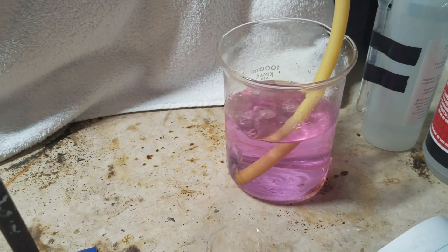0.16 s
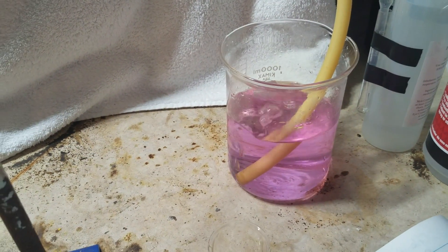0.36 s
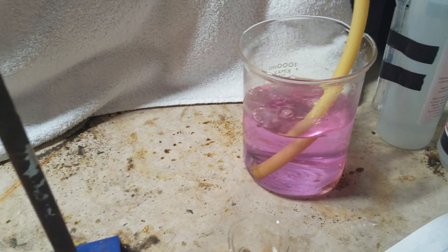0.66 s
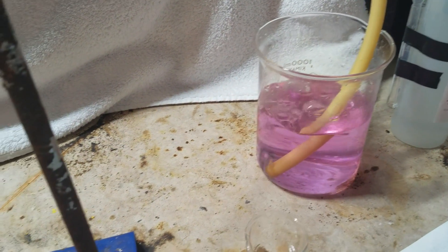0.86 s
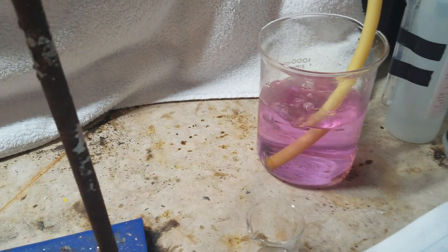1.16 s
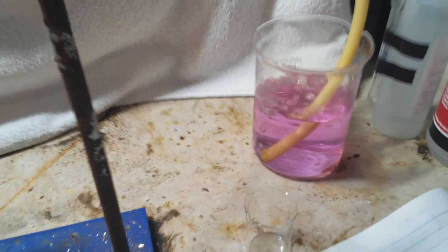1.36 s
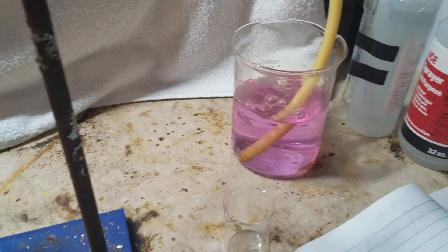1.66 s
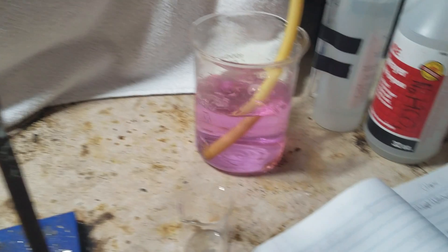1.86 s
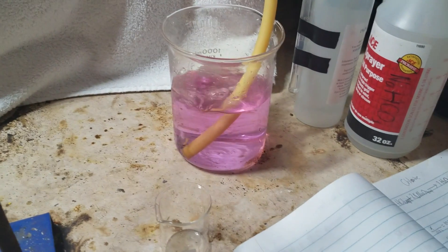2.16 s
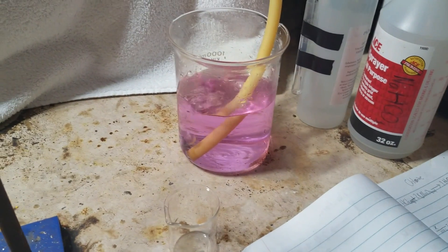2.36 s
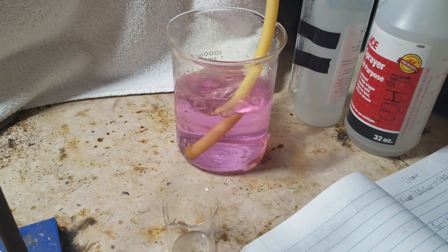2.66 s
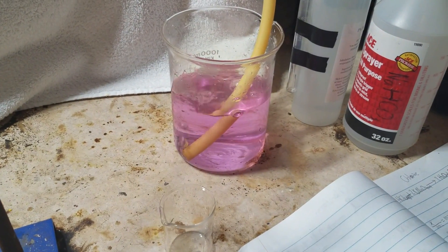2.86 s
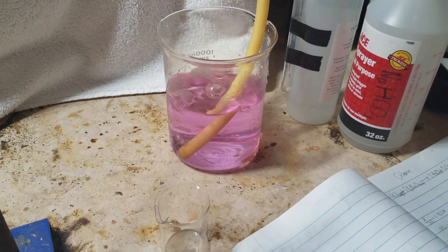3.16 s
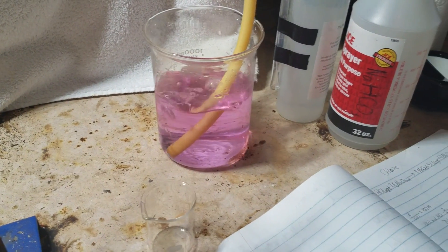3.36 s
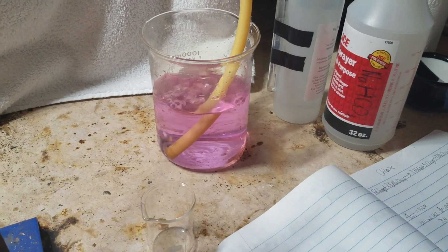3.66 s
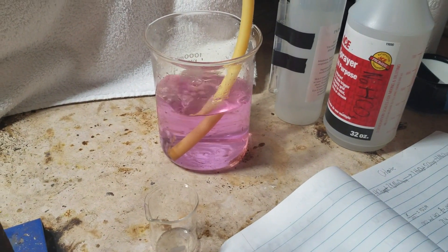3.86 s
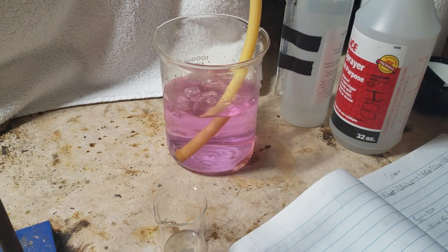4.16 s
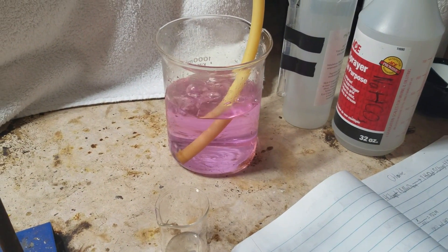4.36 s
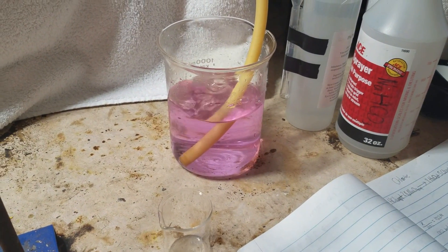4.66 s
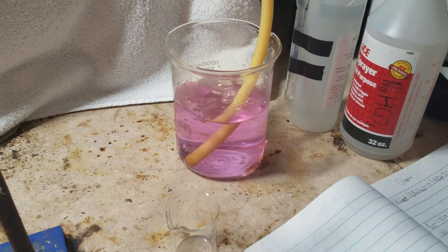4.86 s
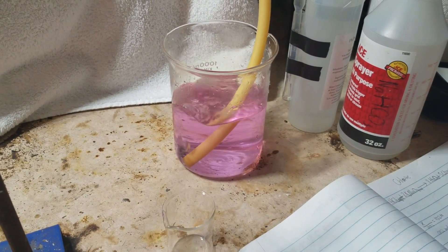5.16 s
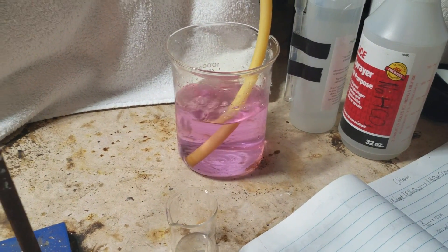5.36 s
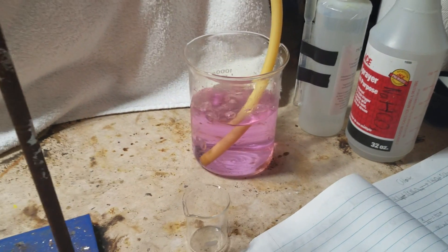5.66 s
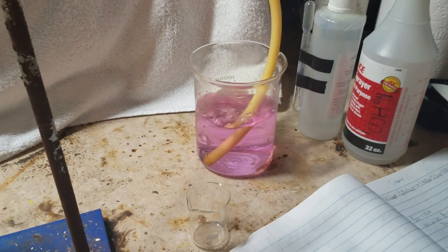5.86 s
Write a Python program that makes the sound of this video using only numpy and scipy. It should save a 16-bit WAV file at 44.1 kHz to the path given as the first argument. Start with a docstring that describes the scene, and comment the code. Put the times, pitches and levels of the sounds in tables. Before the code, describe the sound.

Wet, round glugs keep coming unevenly in a beaker on a lab bench, often in pairs, with tiny bubbles chirping and snapping at the surface. Handling of the camera adds fabric rustle, then a longer hissing slide, one sharp knock and clatter before the middle, and scattered crackly brushes towards the end. The microphone is very close, the room dry, with soft tone underneath.

```python
"""Gas from a rubber hose bubbles through liquid in a glass beaker on a lab bench, close to the microphones.
Each bubble is a damped, unsteady tone that gulps; some chirp upward in gliding tones as they open at
the surface, and tiny ones tick in narrow bursts of noise. Shaped noise brushes and slides like cloth by
the hand-held camera, and a set of bench resonances gives one knock with its rattle. Room tone, a faint
hum and a thin hiss lie underneath."""
import sys
import numpy as np
from scipy import signal
from scipy.fft import rfft, irfft, next_fast_len
from scipy.io import wavfile
from scipy.ndimage import map_coordinates

SR = 44100
rng = np.random.default_rng(int(sys.argv[2]) if len(sys.argv) > 2 else 0)


def generate_wav(sig):
    """Save sig (samples, or channels by samples) to the path in sys.argv[1] as 16-bit PCM at SR."""
    pcm = np.round(np.clip(np.atleast_2d(sig).T, -1, 1) * 32767).astype(np.int16)
    wavfile.write(sys.argv[1], SR, pcm)


N = 265482
AGE = np.arange(SR // 3) / SR  # time since an event began, s

# glugs from the hose; in many, deeper bubbles follow the first:
# start_s, level_db, pitch_hz, then for each follower: wait_s, level_db
GLUGS = [(.002, -50, 400, .024, -41.5), (.153, -44, 430, .041, -41, .078, -45.5), (.166, -43, 420),
         (.339, -48, 470, .036, -45, .078, -43.5), (.352, -46, 415), (.525, -49, 436, .058, -43),
         (.655, -52, 543), (.737, -38, 450), (.811, -42, 500), (.826, -45, 430),
         (.918, -49, 440, .055, -41), (1.074, -44, 440, .055, -37.5),
         (1.257, -45, 417, .035, -43, .087, -47), (1.431, -46, 522, .06, -42), (1.466, -47, 415),
         (1.588, -48, 429, .052, -37.5), (1.765, -44, 450, .041, -41), (1.949, -45, 535, .044, -41),
         (2.069, -38, 552), (2.121, -33, 413, .022, -39), (2.268, -38.5, 480), (2.677, -39, 500, .012, -41),
         (2.758, -42.5, 412, .046, -43), (2.86, -36.5, 525), (2.949, -42, 561, .045, -46),
         (3.049, -38, 499), (3.139, -40, 440, .037, -50), (3.23, -42, 485), (3.268, -47, 509),
         (3.334, -48, 455, .036, -45), (3.419, -42, 544), (3.536, -45, 422, .062, -45),
         (3.727, -44, 448, .063, -45), (3.907, -49, 430, .026, -43, .074, -46),
         (4.091, -47, 448, .021, -45, .068, -42), (4.281, -46, 447, .019, -43.5), (4.354, -39.5, 460),
         (4.376, -46, 377), (4.477, -45, 355, .059, -41.5), (4.671, -45.5, 400, .045, -43),
         (4.84, -49, 451, .04, -41.5), (4.926, -46, 630), (5.028, -45, 449, .034, -48), (5.115, -45, 530),
         (5.209, -45.5, 430, .043, -43), (5.326, -43.5, 529), (5.36, -47, 458), (5.4, -39.5, 424),
         (5.427, -47.5, 441), (5.514, -49, 482, .041, -40, .084, -47), (5.7, -50, 428, .049, -40.5),
         (5.908, -44, 363)]
# colour of the hiss of cloth, also used for the thin background hiss: frequency_hz, level_db (per Hz)
HISS_COLOUR = [(1760, -16), (3000, -7), (3940, -7.5), (7200, -13.5), (8580, -8), (9730, -12), (14700, -7),
               (16000, -10)]


def amp(db):
    """Decibels to gain."""
    return np.exp(np.asarray(db) * (np.log(10) / 20))


def unit(x):
    """x at rms 1."""
    return x / np.sqrt(np.mean(x ** 2) + 1e-20)


def along(points, hz):
    """(Hz, value) points read on a log frequency axis."""
    f, v = np.transpose(points)
    return np.interp(np.log(hz + 1), np.log(f + 1), v)


def gain_curve(points):
    """One gain per sample from (s, dB) points, at -120 dB outside them."""
    s, db = np.transpose(points)
    return amp(np.interp(np.arange(N) / SR, s, db, left=-120, right=-120))


def wobble(rate):
    """A smooth random curve, rate knots a second."""
    knots = rng.standard_normal(int(N * rate / SR) + 4)
    return map_coordinates(knots, [np.arange(N) * rate / SR])


def filtered(x, response):
    """x times a response of frequency."""
    size = x.shape[-1]
    m = next_fast_len(size + SR // 4)
    return irfft(rfft(x, m) * response(np.fft.rfftfreq(m, 1 / SR)), m)[..., :size]


def add(track, s, sound):
    """Mix a sound into a track at time s."""
    size = track.shape[-1]
    start = int(np.clip(round(s * SR), 0, size - 1))
    track[..., start:start + sound.shape[-1]] += sound[..., :size - start]


def noise(spectrum, alike=None):
    """Stereo noise of rms 1; mid and side are balanced to set the likeness of left and right."""
    # usual likeness of the two channels: frequency_hz, correlation (-1 to 1)
    usual_alike = [(60, 0.13), (200, 0.67), (600, 0.83), (1400, -0.16), (2600, -0.19), (6000, 0.058),
                   (15000, -0.058)]
    likeness = usual_alike if alike is None else alike

    def mid_and_side(hz):
        turn = np.arccos(np.clip(along(likeness, hz), -1, 1)) / 2
        return amp(along(spectrum, hz)) * [np.cos(turn), np.sin(turn)]

    mid, side = filtered(rng.standard_normal((2, N)), mid_and_side)
    return unit(np.array([mid + side, mid - side]))


def fade(t60, attack):
    """A quick rise and an exponential decay."""
    return amp(-60 * AGE / max(t60, 1e-3)) * (1 - np.exp(-AGE / attack))


def ring(hz, t60, attack):
    """One damped vibration."""
    return np.sin(2 * np.pi * hz * AGE) * fade(t60, attack)


def struck(modes, attack):
    """All modes of a body, at slightly new strengths and random polarity for each blow."""
    strength = amp(2 * rng.standard_normal(len(modes))) * rng.choice([-1, 1], len(modes))
    return sum(g * amp(db) * ring(hz, t60, attack) for g, (hz, db, t60) in zip(strength, modes))


def snap(hz, t60, octaves):
    """A burst of noise of peak 1 around one frequency."""
    distance = np.square(np.log2((np.fft.rfftfreq(len(AGE), 1 / SR) + 1) / hz) / octaves)
    coloured = irfft(rfft(rng.standard_normal(len(AGE))) / (1 + distance * distance), len(AGE))
    burst = coloured * fade(t60, attack=0.000067)
    return burst / np.abs(burst).max()


def from_left(x, lag_s):
    """x reaching the left microphone lag_s before the right, by opposite phase slopes."""
    return filtered(x, lambda hz: np.exp(1j * np.pi * hz * lag_s * np.array([[1], [-1]])))


def background():
    """Room tone as shaped noise, a faint hum of unsteady sines and a thin flickering hiss."""
    # colour of the room tone: frequency_hz, level_db (per Hz)
    air_colour = [(20, -30), (35, -24), (55, -13), (100, -8), (155, -24), (250, -9.5), (380, -10.5),
                  (700, -16.5), (1300, -21), (2300, -23.5), (5500, -36), (16000, -38)]
    # hum before its level wanders: frequency_hz, level_db
    hum_tones = [(120, -78), (366, -71)]
    # relative level of the thin hiss: time_s, level_db
    fizz_level = [(0.0, -74), (0.84, -77), (1.24, -74), (1.42, -67), (2.21, -61), (3.0, -72), (4.79, -72),
                  (4.95, -76), (5.9, -72), (6.02, -67)]
    t = np.arange(N) / SR
    hum = sum(amp(db + 2.8 * wobble(2.86)) * np.sin(2 * np.pi * hz * t) for hz, db in hum_tones)
    fizz = amp(3.8 + 2.2 * wobble(90)) * gain_curve(fizz_level) * noise(HISS_COLOUR)
    return amp(-62.6) * noise(air_colour) + hum + fizz


def fibres(spectrum):
    """Unevenly catching cloth: noise with sparse clicks in it."""
    crackle_db, crackles_per_s = -5, 260  # single fibres catching, relative to the noise
    clicks = (rng.random(N) < crackles_per_s / SR) * rng.standard_normal((2, N))
    crackle = unit(filtered(clicks, lambda hz: amp(along(spectrum, hz))))
    unevenness_db = 1.1 * wobble(45) + 1.6 * wobble(160) + 1.9 * wobble(900)
    return (noise(spectrum) + amp(crackle_db) * crackle) * amp(unevenness_db)


def cloth():
    """Friction as shaped noise: a faint rustle, short brushes with snags, and one long hissing slide."""
    # faint rustle that never quite rests: time_s, level_db
    rustle_level = [(0, -73), (.4, -70), (.65, -80), (1.3, -68), (3.1, -65), (3.3, -59.5), (3.6, -60),
                    (4.25, -68), (4.6, -65), (5, -74), (5.3, -66), (6, -67)]
    # colour of the rasp of cloth: frequency_hz, level_db (per Hz)
    rasp_colour = [(40, -4), (100, 3), (150, -4), (290, 4.5), (500, 6), (832, 5.5), (1250, 5.5), (1930, 3),
                   (2210, 6), (2640, -1.5), (3920, -17), (6000, -33.5), (7800, -39), (13200, -120)]
    # short brushes: start_s, length_s, rising_share (0-1), rasp_db, hiss_db
    brush_rows = [(0.214, 0.087, .5, -60, -66), (1.23, 0.5, .45, -63.5, -62.5), (1.428, .035, .2, -58, -60),
                  (1.5, .1, .45, -61, -70), (1.76, .22, .45, -51, -62), (3.61, 0.18, .45, -60.5, -66),
                  (3.99, .05, .3, -55, -59), (4.085, .09, .4, -59.5, -62), (4.296, 0.068, .68, -59, -55),
                  (4.41, 0.07, .5, -54, -57), (4.531, 0.04, .25, -57.5, -57), (4.56, .2, .65, -62, -66),
                  (4.74, 0.19, .35, -55.5, -60.5), (5.815, 0.135, .22, -51.5, -52.5),
                  (5.935, 0.08, .4, -55, -64)]
    # fibres snagging and letting go: start_s, level_db, colour_hz
    snag_rows = [(4.001, -42, 12000), (4.008, -44, 2200), (4.107, -46, 9000), (4.12, -44, 8000),
                 (4.331, -42, 9000), (4.346, -39, 12000), (4.42, -46, 6000), (4.435, -44, 5000),
                 (4.446, -41, 2200), (4.468, -45, 7000), (4.535, -46, 4200), (4.649, -49, 7000),
                 (4.691, -43, 5000), (4.803, -44, 1800), (5.817, -41, 1800), (5.833, -42, 9000),
                 (5.843, -40, 3000), (5.966, -45, 2000)]
    # relative level of the body of the slide: time_s, level_db
    slide_level = [(1.66, -70), (1.79, -53), (1.87, -50), (1.95, -51.5), (2.12, -46.5), (2.3, -48.5),
                   (2.68, -49.5), (2.86, -52.5), (2.94, -57), (3.1, -66)]
    # relative level of the hiss of the slide: time_s, level_db
    sheen_level = [(1.7, -74), (1.8, -61), (1.87, -53), (1.95, -55), (2.13, -49), (2.58, -54.5),
                   (2.76, -58.5), (2.86, -58), (2.91, -65), (3.1, -76)]
    # colour of the body of the slide: frequency_hz, level_db (per Hz)
    slide_body = [(100, -23), (200, -25), (300, -10), (390, -1), (500, -3.5), (720, -5), (950, -11.5),
                  (1150, -5.5), (1400, -9), (1650, -9), (2400, -16.5), (3500, -35), (7000, -78)]
    # colour of the hiss of the slide: frequency_hz, level_db (per Hz)
    slide_hiss = [(1470, -27), (2300, -1), (3000, 6), (3400, 3), (3950, 2.5), (4480, 3), (6060, -7.5),
                  (6600, -3.5), (7470, -6), (9510, -8), (14900, -15), (16000, -17)]
    # the slide comes from one spot: frequency_hz, left_right_correlation (-1 to 1)
    slide_alike = [(100, .75), (500, .88), (1500, .85), (2600, .62), (4000, .72), (5500, .68), (9000, .5),
                   (15000, .35)]
    slide_lag_s, rustle_hiss_db = .00019, -9  # the hiss is relative to the rasp

    rustle_db = 1.5 * wobble(30) + 2 * wobble(200) - .7
    rustle_noise = noise(rasp_colour) + amp(rustle_hiss_db) * noise(HISS_COLOUR)
    rustle = gain_curve(rustle_level) * amp(rustle_db) * rustle_noise

    rasp, hiss, snags = np.zeros(N), np.zeros(N), np.zeros((2, N))
    for s, length, rise, rasp_db, hiss_db in brush_rows:
        turning_point = np.clip(rise, .05, .95)
        progress = np.interp(np.linspace(0, 1, round(length * SR)), [0, turning_point, 1], [0, .5, 1])
        stroke = np.abs(np.sin(np.pi * progress)) ** 1.6
        add(rasp, s, amp(rasp_db) * stroke)
        add(hiss, s, amp(hiss_db) * stroke)
    brushes = amp(1.5) * (rasp * fibres(rasp_colour) + hiss * fibres(HISS_COLOUR))
    for s, db, hz in snag_rows:
        left_right = np.array([snap(hz, t60=.045, octaves=1.1) for _ in range(2)])
        add(snags, s, amp(db - 2) * left_right)

    drag_db = .8 * wobble(22) + 1.3 * wobble(110)  # shared unevenness of the slide
    body = amp(4.4 + drag_db) * gain_curve(slide_level) * noise(slide_body, slide_alike)
    sheen = amp(.6 * drag_db) * gain_curve(sheen_level) * noise(slide_hiss, slide_alike)
    return from_left(body + sheen, slide_lag_s) + brushes + snags + rustle


def released():
    """The bubbles of all glugs as (s, level dB, pitch Hz, life s): the first bubble, then its followers."""
    # a first bubble's ringing time at that level; a harder one surfaces sooner
    life_s, life_at_db, db_per_halving = .038, -45, 14
    longest_life_s = .055  # the time it takes to rise through the liquid
    follower_hz, follower_life_s = 368, .038  # followers have nearly the same size
    bubbles = []
    for (s, db, hz, *followers), size in zip(GLUGS, rng.random(len(GLUGS))):
        life = life_s * 2 ** ((life_at_db - db) / db_per_halving)
        bubbles.append((s, db, hz, min(longest_life_s, life)))
        for wait, follower_db in zip(followers[::2], followers[1::2]):
            pitch = follower_hz * (1 + .04 * (size - .5))
            bubbles.append((s + wait, follower_db, pitch, follower_life_s))
    return bubbles


def bubble(out_db, hz, life):
    """A bubble pinches off, pulsates, shakes the beaker, and falls silent as it nears the surface."""
    # resonances of beaker and bench under the gulps: frequency_hz, level_db
    beaker_modes = [(222, -3), (262, 1.5), (412, 3.5), (522, -3), (622, -6.5)]
    # a rising bubble changes shape, which shakes its pitch and level
    wobble_per_s, wobble_octaves, wobble_db = 170, .05, 1.8
    # the liquid churns on behind each bubble
    swirl_db, swirl_hz, swirl_t60_s = -19, 520, .2

    submerged = np.exp(-(AGE / max(life, .008)) ** 2.5)
    glide = 1 + 0.2 * np.exp(-AGE / 0.0029)  # the pitch settles as the bubble rounds off
    shape_knots = rng.standard_normal(size=(2, 40))
    stretch, squeeze = (np.interp(AGE * wobble_per_s, np.arange(len(k)), k) for k in shape_knots)
    phase = 2 * np.pi * np.cumsum(hz * glide * 2 ** (wobble_octaves * stretch)) / SR
    pulsation = np.sin(phase) * amp(wobble_db * squeeze) * fade(t60=0.55, attack=0.0011)
    jolt = amp(3) * ring(500, t60=0.0088, attack=0.00051)
    body = amp(-8) * struck([(f, level, .25) for f, level in beaker_modes], attack=0.0014)
    splash = amp(-12) * snap(1320, t60=0.51, octaves=0.69)
    swirl = amp(swirl_db) * snap(swirl_hz, swirl_t60_s, octaves=.5)
    sound = amp(out_db - 1.4) * (submerged * (pulsation + jolt + body + splash) + swirl)
    # the liquid slaps back into the mouth of the hose, twice
    waits = rng.uniform([.009, .02], [.02, .036])
    for wait, pitch in zip(waits, rng.uniform(420, 620, size=2)):
        add(sound, wait, amp(out_db - 7) * ring(pitch, t60=.02, attack=.0008))
    return sound


def gulps(bubbles):
    """Every bubble gulps as it leaves the hose."""
    out = np.zeros(N)
    for s, db, hz, life in bubbles:
        add(out, s, bubble(db, hz, life))
    return out


def droplets(bubbles, spray_db, pitch_hz, scatter_db, count):
    """Every gulp stirs the surface and sheds faint little bubbles, each rising in pitch as it dies."""
    out = np.zeros(N)
    t = AGE[AGE < .04]
    for s, db, _, _ in bubbles:
        for wait, size, strength in rng.standard_normal((count, 3)):
            cycles = pitch_hz * 2 ** (.6 * size) * t
            tone = np.sin(2 * np.pi * cycles * (1 + cycles / 300))
            drop = tone * np.exp(-cycles / 7) * (1 - np.exp(-cycles))
            add(out, s + 0.038 * abs(wait), amp(db + spray_db + scatter_db * strength) * drop)
    return out


def slosh(bubbles, count):
    """In the wake of each gulp weaker bubbles break off at odd moments, each sliding up a little."""
    slosh_db, slosh_hz, usual_delay_s = -17, 420, .045  # level relative to the gulp
    out = np.zeros(N)
    for s, db, _, _ in bubbles:
        for wait, size, strength in rng.standard_normal((count, 3)):
            drop = ring(slosh_hz * 2 ** (.3 * size) * (1 + 1.5 * AGE), t60=.075, attack=.002)
            when = s + usual_delay_s * np.exp(.45 * wait)
            add(out, when, amp(db + slosh_db + 3 * strength) * drop)
    return out


def chirps():
    """As the hole in a surfaced bubble widens, its cavity's pitch climbs unsteadily and the skin spatters."""
    # large bubbles opening at the surface: centre_s, level_db, pitch_hz (at the centre),
    # spatter_db (relative to the tone)
    chirp_rows = [(.056, -44.5, 880, -12), (.175, -46.5, 870, -9), (.358, -56, 860, -6),
                  (.546, -54, 900, -6), (.842, -53, 920, -8), (1.126, -50, 1020, -7), (1.287, -51, 900, -4),
                  (1.468, -49, 950, -8), (1.499, -49, 1050, -7), (2.895, -44, 900, -8),
                  (3.084, -45, 900, -8), (3.928, -43, 880, -4), (4.3, -50, 820, -4), (4.565, -52, 880, -5),
                  (4.742, -48, 865, -4), (5.055, -40, 880, -7), (5.41, -51, 865, -5), (5.729, -51, 865, -7)]
    usual_climb, overtone_db = 24, -15  # octaves per s; each overtone under the one before
    # any other glug opens faintly this long after it starts, at a level relative to the glug
    surfacing_s, faint_db, faint_hz = .025, -15, 865
    lead = .04  # s from the start of a chirp to its centre
    out = np.zeros(N)
    t = AGE[AGE < 2 * lead] - lead
    faint = [(s + surfacing_s, db + faint_db, faint_hz, 0) for s, db, *_ in GLUGS
             if all(abs(s - row[0]) > 2 * lead for row in chirp_rows)]
    for s, db, hz, spatter_db in chirp_rows + faint:
        octaves_per_s = usual_climb * np.exp(.15 * rng.normal())
        quiver = np.interp(t, np.linspace(-lead, lead, num=30), rng.standard_normal(size=30))
        phase = 2 * np.pi * np.cumsum(hz * 2 ** (octaves_per_s * t + 0.085 * quiver)) / SR
        swell = np.hanning(len(t)) / np.cosh(t / np.where(t < 0, .0095, .011))
        swell = swell * amp(2.8 * quiver + .5)
        tone = sum(amp(k * overtone_db) * np.sin((k + 1) * phase) for k in range(3))
        spatter = amp(spatter_db) * unit(snap(1100, t60=0.72, octaves=0.6)[:len(t)]) / 2
        add(out, s - lead, amp(db) * swell * (tone + spatter))
    return out


def bursts():
    """Skins pop dryly, tiny bubbles tick high, faint ones at random; clear glassy rings sound over some chirps."""
    # dry pops of the bubble skins: start_s, level_db, colour_hz, width_octaves
    pop_rows = [(0.171, -44, 2280, .6), (.255, -47, 2400, .5), (.27, -46, 1100, 1), (.378, -46, 1700, .8),
                (0.427, -46, 2370, .5), (0.823, -45.5, 2200, .7), (1.359, -31, 11000, 1.2),
                (1.429, -31, 2000, 1.7), (1.682, -46, 2000, 1), (2.973, -35, 750, 1.2),
                (3.324, -51, 3500, 1.5), (4.121, -42, 3080, 1), (4.841, -38.5, 685, .7),
                (5.235, -39, 1500, 1.6), (5.384, -47, 1100, .6), (5.475, -30, 720, .65)]
    # tiny bubbles bursting: start_s, level_db, pitch_hz, t60_s
    tick_rows = [(.2067, -35.5, 6200, .03), (.2696, -45, 14100, .016), (1.6227, -43, 10900, .016),
                 (3.172, -41, 10700, .053), (3.7893, -50, 9800, .049), (3.8823, -38.5, 14100, .02),
                 (4.05, -45, 11200, .028), (4.691, -38, 15400, .03), (5.091, -49, 8050, .028),
                 (5.161, -47, 4200, .05), (5.1748, -38.5, 8800, .063), (5.267, -47, 14500, .016),
                 (5.601, -49, 4300, .025)]
    # clear short glassy rings over some chirps: start_s, level_db, pitch_hz (at the start), t60_s
    plink_rows = [(5.045, -41, 1880, 0.055), (5.055, -57, 2890, 0.032), (5.752, -59, 1540, .07)]
    # the faint ticks scatter around this level and pitch
    faint_per_s, faint_db, faint_hz, faint_t60_s = 4, -61, 9500, .02
    out = np.zeros(N)
    for s, db, hz, width in pop_rows:
        add(out, s, amp(db) * snap(hz, t60=0.016, octaves=width))
    faint = []
    for when, force, size in rng.random((round(faint_per_s * N / SR), 3)):
        level = faint_db + 10 * (force - .5)
        pitch = faint_hz * 2 ** (1.6 * (size - .5))
        faint.append((when * N / SR, level, pitch, faint_t60_s))
    for s, db, hz, t60 in tick_rows + faint:
        crack = snap(hz, t60=0.0069, octaves=0.8)
        add(out, s, amp(db - 1.2) * (snap(hz, t60, octaves=0.12) + crack))
    for s, db, hz, t60 in plink_rows:
        add(out, s, amp(db + 7) * ring(hz * (1 + .4 * AGE), t60, attack=0.002))
    return out


def splashes(count):
    """A dome of liquid collapses: one sharp plop, then a spray of ever weaker little bubbles."""
    # collapsing domes: start_s, level_db, pitch_hz
    dome_rows = [(1.128, -44, 1200), (1.499, -41, 1050), (1.543, -48, 1000), (3.68, -35, 780),
                 (3.934, -49, 900), (4.348, -38, 850), (4.803, -42, 880)]
    # how long the spray keeps falling, its scatter of pitch, and how it weakens meanwhile
    spread_s, spread_octaves, loss_db = .022, .3, 10
    out = np.zeros(N)
    for s, db, hz in dome_rows:
        add(out, s, amp(db) * ring(hz, t60=.025, attack=.0005))
        for late, size in zip(rng.random(count), rng.standard_normal(count)):
            drop = ring(hz * 2 ** (spread_octaves * size), t60=.025, attack=.0005)
            add(out, s + spread_s * late, amp(db - 4 - loss_db * late) * drop)
    return out


def knock():
    """A dull blow rings the bench's resonances and rattles; handling adds soft low bumps."""
    # soft handling bumps: start_s, level_db
    bump_rows = [(1.86, -46), (2.072, -44), (2.976, -42), (3.685, -50), (4.023, -53), (4.112, -47),
                 (4.348, -42.5), (4.478, -48), (4.605, -53)]
    # the blow on the bench and its rattle: start_s, level_db
    blow_rows = [(2.568, -23), (2.578, -28), (2.59, -27.5), (2.598, -32), (2.636, -29.5)]
    # resonances of the bench: frequency_hz, level_db, t60_s
    bench_modes = [(113, -11, .22), (182, -8, .13), (225, 1, .12), (259, -5, .15), (301, -1.5, .17),
                   (366, -1, .18), (442, -9, .12), (495, -6, .17), (556, -4, .13), (641, -5, .09),
                   (720, -12, .09), (783, -9, .09), (870, -9, .052), (975, -14, .08), (1160, -13, .1),
                   (1950, -17, .041), (2296, -25, .05)]
    # colour of the contact noise: frequency_hz, level_db (per Hz)
    thud_colour = [(70, -45), (130, -36), (230, -8), (380, 0), (800, 6.5), (1300, -14), (2200, -14),
                   (3500, -29), (8000, -43)]
    bump_hz = 102
    push_db, push_hz, crack_db, crack_hz = -20, 290, -36, 2100  # the first blow pushes the whole top
    clack_db, clack_hz = -25, 820  # the object that lands gives a short clack of its own

    out, contact = np.zeros(N), np.zeros(N)
    for s, db in bump_rows:
        bump = ring(bump_hz, t60=0.12, attack=0.011) + amp(-7) * snap(110, t60=0.15, octaves=0.5)
        add(out, s, amp(db) * bump / np.abs(bump).max())
    for s, db in blow_rows:
        add(out, s, amp(db - 7.3) * struck(bench_modes, attack=0.0009))
        add(contact, s, amp(db - 2.5) * fade(t60=0.06, attack=0.0004))
    first_s = blow_rows[0][0]
    add(out, first_s, amp(push_db) * ring(push_hz, t60=.035, attack=.0015))
    add(out, first_s, amp(crack_db) * snap(crack_hz, t60=.03, octaves=.3))
    add(out, first_s, amp(clack_db) * ring(clack_hz, t60=.035, attack=.0006))
    # the bench radiates little deep bass
    return filtered(out + contact * noise(thud_colour), lambda hz: (1j * hz / (1j * hz + 55)) ** 2)


def room(x, near_db, tail_db):
    """Bench and bottles scatter the higher pitches within milliseconds, then the walls answer faintly."""
    # decay of the wall reverberation: frequency_hz, t60_s
    wall_decay = [(150, .22), (500, 0.6), (2000, 0.18), (12000, 0.36)]
    hz, t, z = signal.stft(rng.standard_normal((2, len(AGE))), SR, nperseg=256)
    decaying = z * amp(-60 * t / along(wall_decay, hz)[:, None])
    tail = signal.istft(decaying, SR, nperseg=256)[1][:, :len(AGE)]
    near = rng.standard_normal((2, len(AGE))) * fade(t60=0.09, attack=0.0018)
    near = filtered(near, lambda f: 1j * f / (1j * f + 900))
    near_answer = amp(near_db) * near / np.linalg.norm(near[0])
    wall_answer = amp(tail_db) * tail / np.linalg.norm(tail[0])
    return signal.fftconvolve(x[None], near_answer + wall_answer, axes=1)[:, :N]


def scene():
    """The beaker, reaching the left microphone first, its room, and the knock, cloth and background."""
    beaker_low_hz = 135  # the small beaker radiates little below this
    bubbles = released()
    beaker = gulps(bubbles) + slosh(bubbles, count=3)
    beaker += droplets(bubbles, spray_db=-17.5, pitch_hz=1713, scatter_db=2.5, count=3)
    beaker += chirps() + bursts() + splashes(count=8)
    low_cut = signal.butter(2, beaker_low_hz, "high", fs=SR, output="sos")
    beaker = signal.sosfilt(low_cut, beaker)
    direct = from_left(beaker, lag_s=.0004)
    answer = room(beaker, near_db=-11, tail_db=-21)
    return direct + answer + knock() + cloth() + background()


def record(dry):
    """The stereo microphones differ in level by frequency; nothing is kept above the band limit."""
    # level difference of the channels, split evenly between them: frequency_hz, left_minus_right_db
    left_over_right = [(60, 4.5), (200, 2), (450, -0.2), (1200, 2.5), (2400, 0), (4400, 2), (8000, 3.5),
                       (14000, 5)]
    top_hz = 16000
    halves = np.array([[.5], [-.5]])
    return filtered(dry, lambda hz: amp(along(left_over_right, hz) * halves) * (hz < top_hz))


dry = scene()
out = record(dry)
generate_wav(out)
```